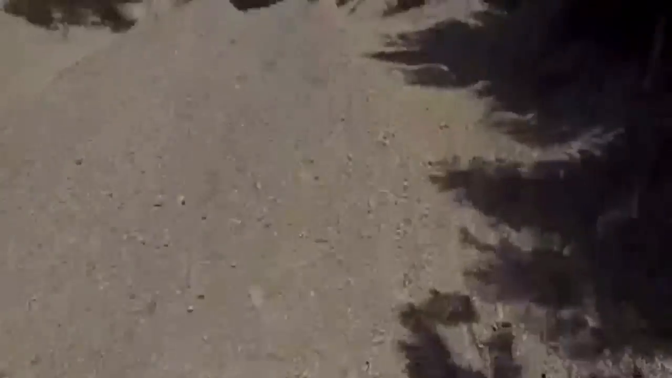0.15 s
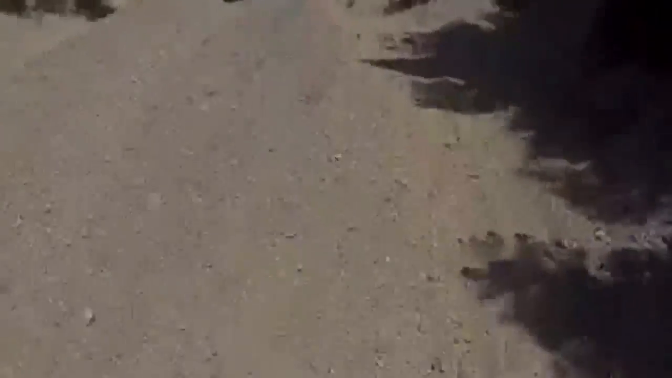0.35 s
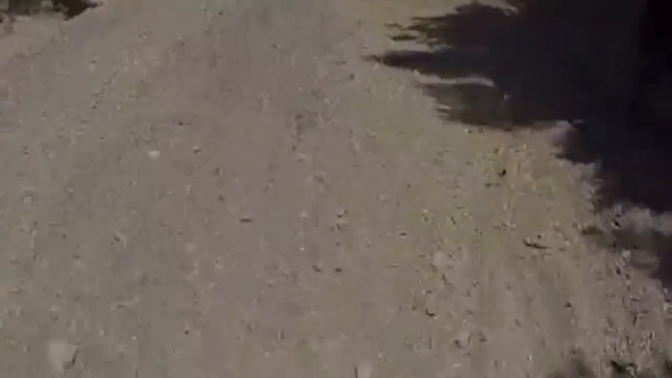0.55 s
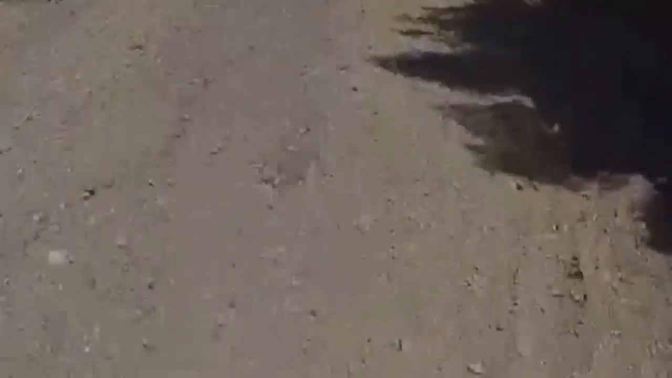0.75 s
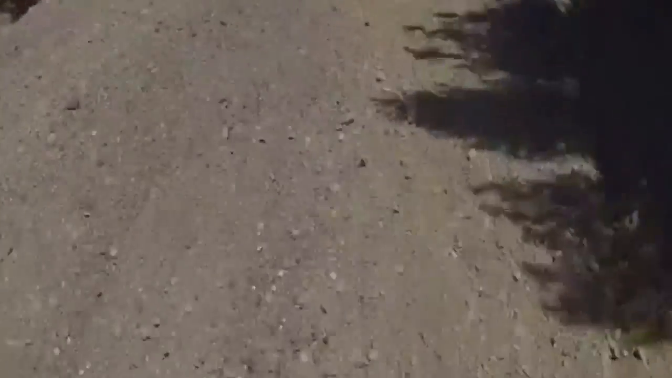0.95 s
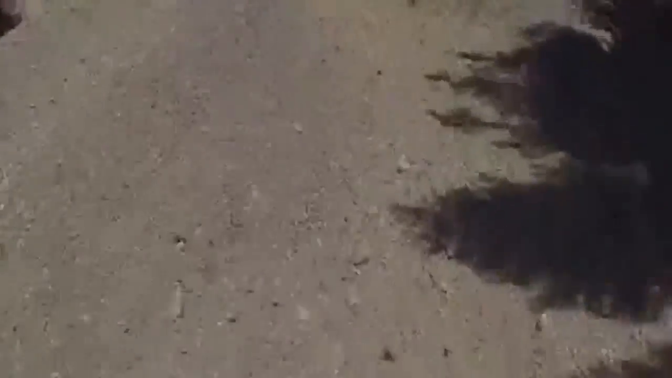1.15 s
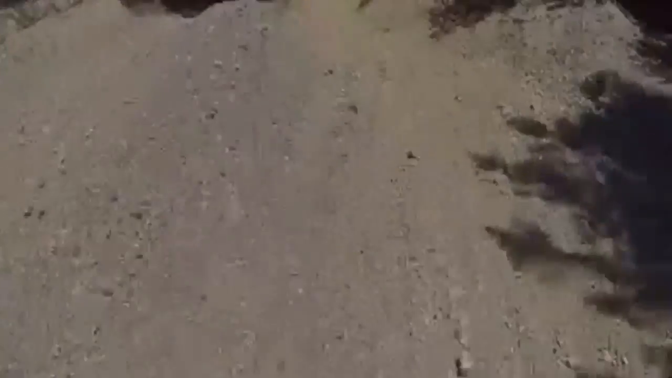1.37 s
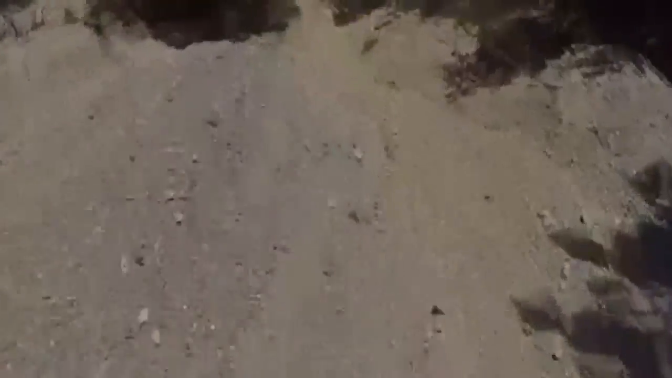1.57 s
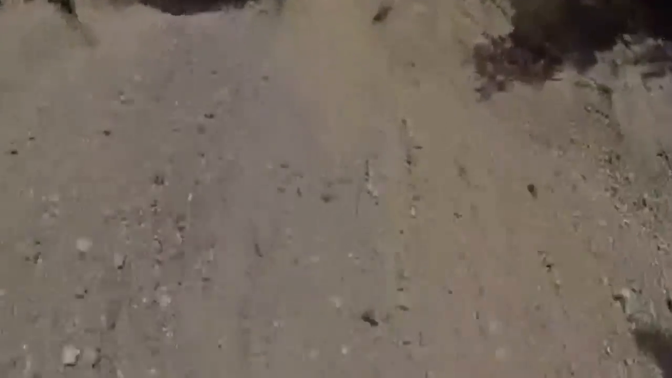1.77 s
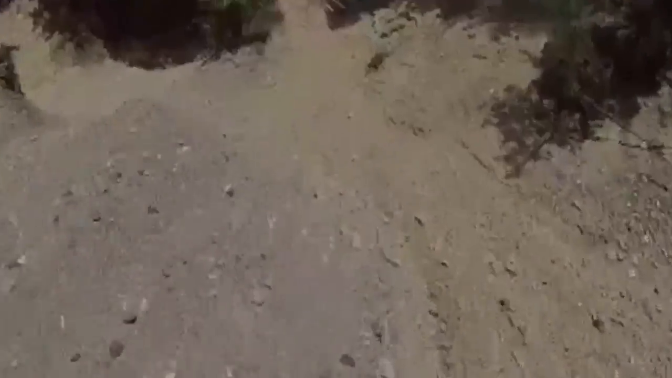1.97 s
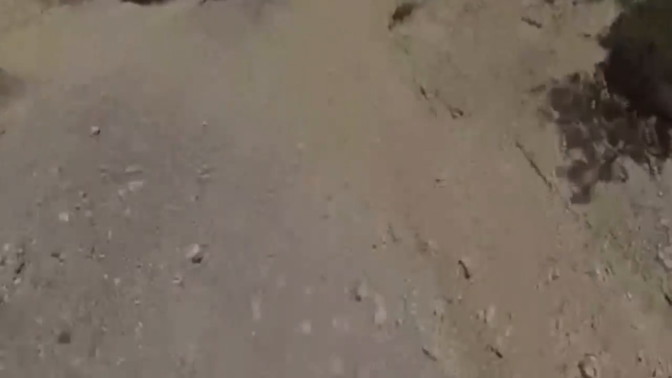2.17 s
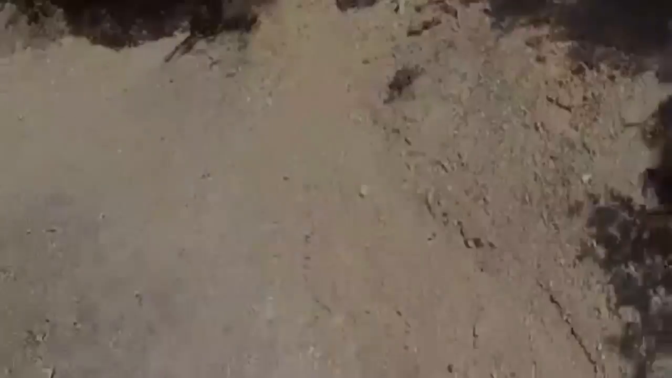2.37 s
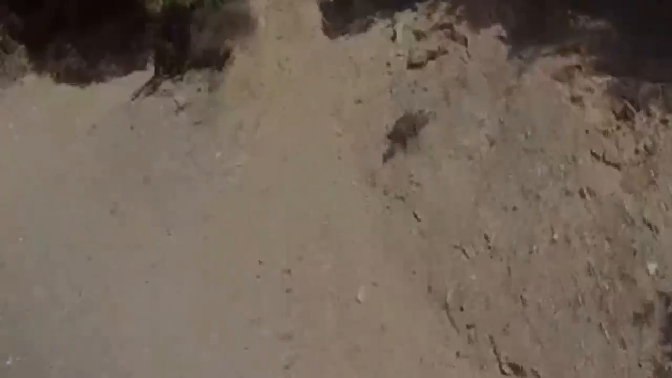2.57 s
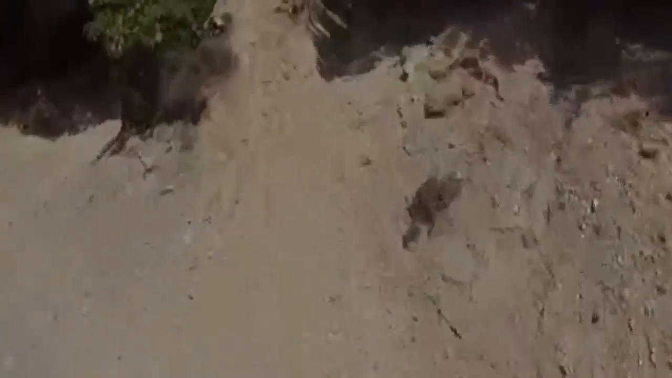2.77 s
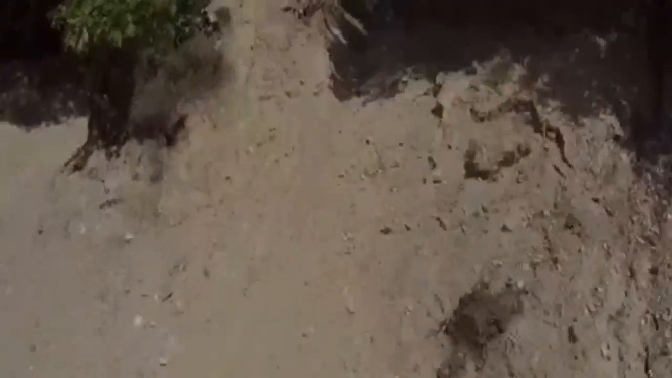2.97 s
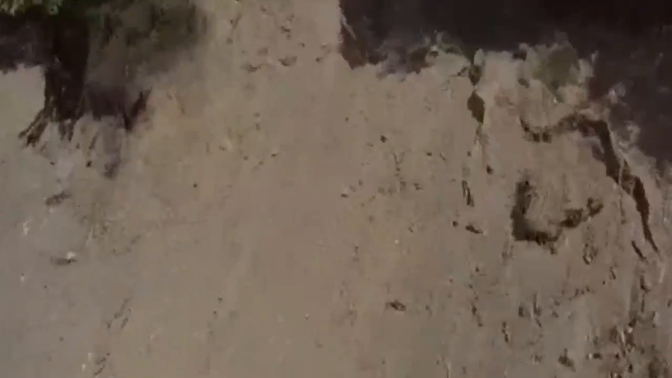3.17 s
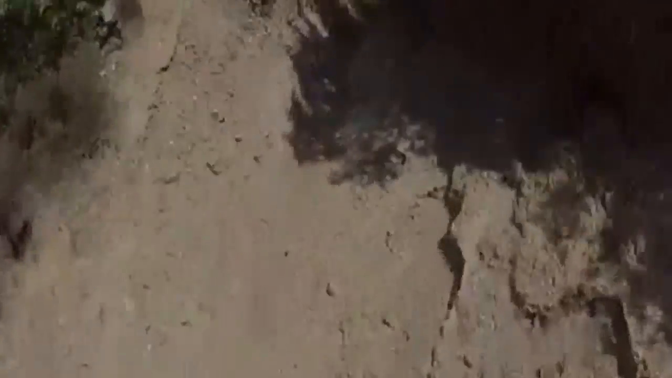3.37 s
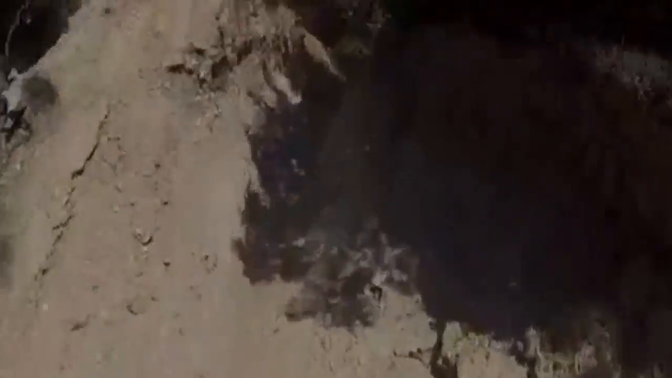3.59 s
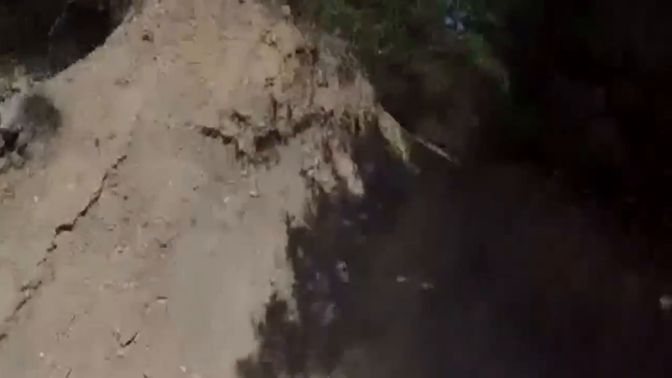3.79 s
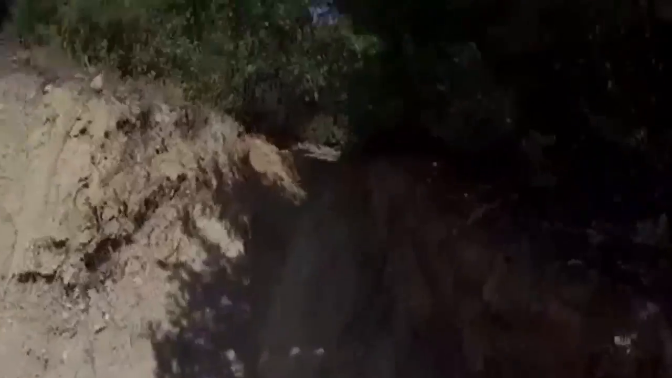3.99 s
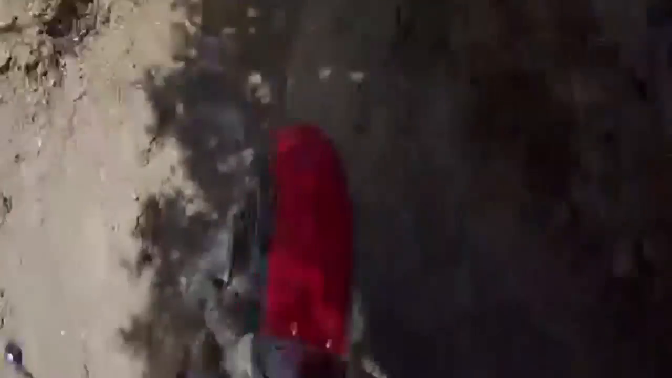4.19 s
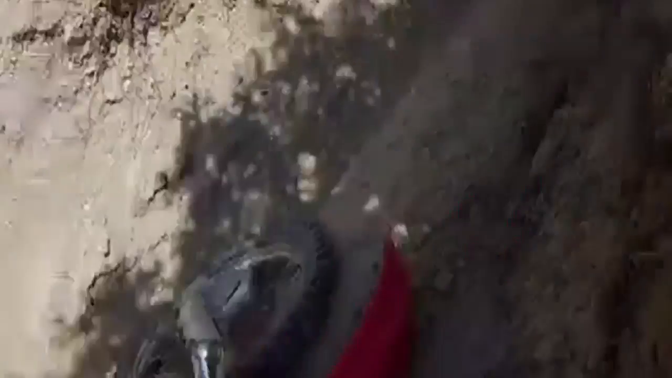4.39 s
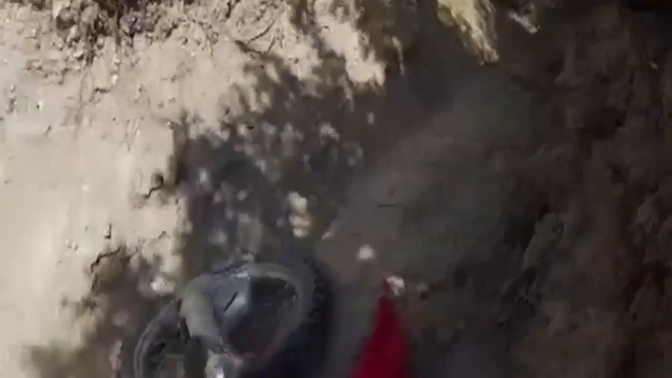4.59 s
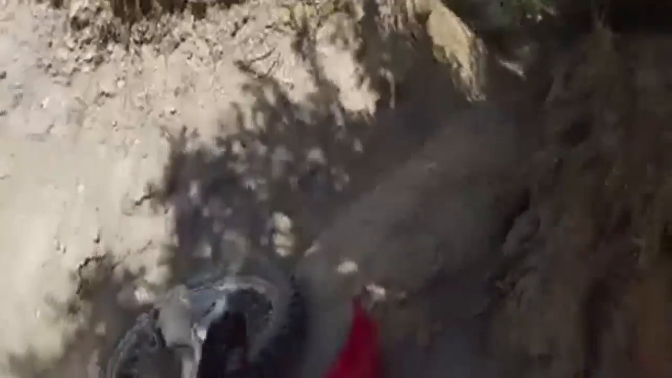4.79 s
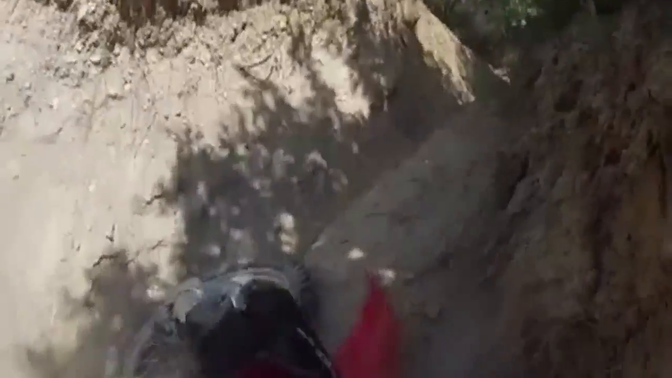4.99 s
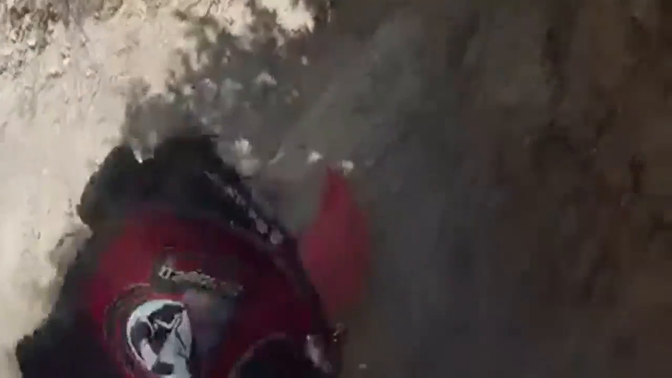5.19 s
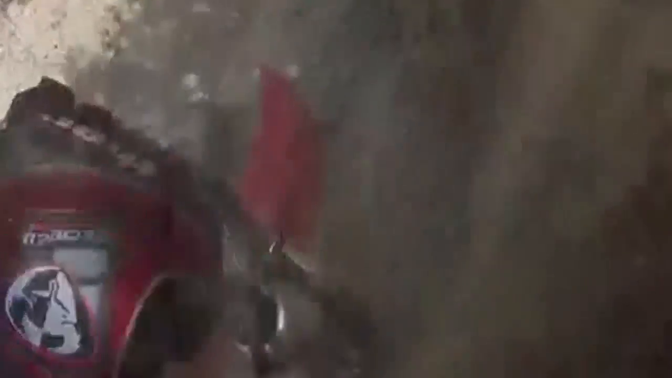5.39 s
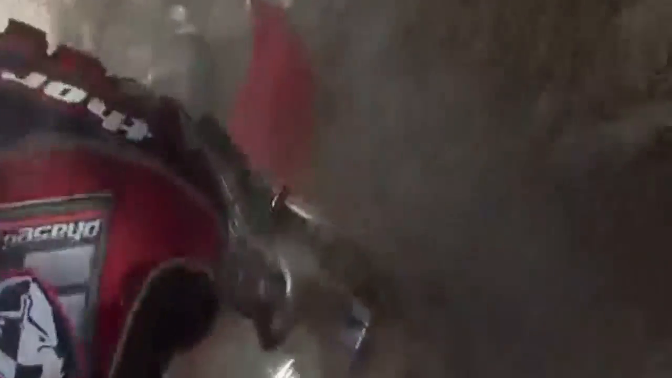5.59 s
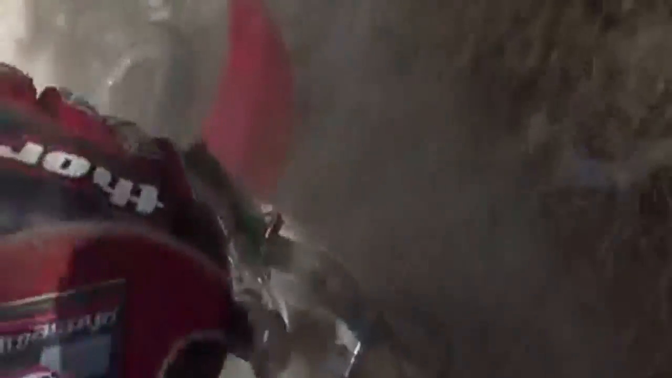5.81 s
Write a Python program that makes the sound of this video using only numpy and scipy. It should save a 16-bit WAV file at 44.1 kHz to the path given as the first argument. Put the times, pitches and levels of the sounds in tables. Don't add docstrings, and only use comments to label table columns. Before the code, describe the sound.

A two-stroke dirt bike rasps and surges up a gravel slope, bogs down and stalls, then crashes with heavy thumps, scraping dirt and ticking pebbles.

```python
import sys
import numpy as np
from scipy import signal
from scipy.fft import rfft, irfft
from scipy.io import wavfile
from scipy.ndimage import uniform_filter1d, map_coordinates

SR = 44100
rng = np.random.default_rng(int(sys.argv[2]) if len(sys.argv) > 2 else 0)


def gain_from_db(level_db):
    decades = np.asarray(level_db, float) / 20
    return 10 ** decades


def wrap_up_sound(samples):
    columns = np.atleast_2d(samples).T
    tamed = np.clip(columns, -1, 1)
    steps = np.round(tamed * 32767).astype(np.int16)
    wavfile.write(sys.argv[1], SR, steps)


N = 257984
CRUISE_DB, CRUISE_HZ = -18, 140

# centre_hz, width_hz, lift_db over the slope
HOUSING = [(1270, 110, 8), (1515, 90, 16), (1650, 130, 11), (1770, 70, 5), (2350, 250, 7), (2590, 90, 9),
           (3400, 130, 5.5), (4080, 80, 7), (5030, 120, 4), (6040, 200, 5), (7200, 250, 5),
           (13000, 700, 12)]
# start_s, end_s, multiple, level_db
SING = [(0, .13, 8, -41), (.07, .12, 10, -26), (.09, .29, 11, -16.5), (.12, .31, 12, -36),
        (.1, .33, 9, -37), (.275, .445, 11, -19), (.3, .44, 10, -26), (.34, .42, 9, -24),
        (.52, .59, 10, -27), (.53, .6, 11, -26), (.54, .6, 12, -24), (.54, .6, 14, -27),
        (.66, .78, 12, -28), (.81, .99, 12, -27), (.86, .98, 10, -24), (.91, 1.01, 11, -27),
        (1, 1.1, 11, -22), (1.03, 1.11, 10, -26), (1.09, 1.19, 12, -28), (1.11, 1.19, 11, -18.5),
        (1.17, 1.25, 11, -24), (1.11, 1.33, 9, -26), (1.24, 1.31, 10, -25), (1.285, 1.35, 10, -17),
        (1.43, 1.53, 11, -21), (1.44, 1.53, 9, -27), (1.51, 1.63, 10, -21.5), (1.57, 1.68, 9, -18),
        (1.62, 1.74, 8, -26), (1.685, 1.75, 9, -21), (1.86, 1.94, 13, -25), (2.05, 2.22, 12, -23),
        (2.07, 2.16, 11, -23), (2.14, 2.43, 10, -29), (2.2, 2.43, 13, -28), (2.23, 2.34, 12, -27),
        (2.34, 2.46, 11, -27), (2.28, 2.43, 9, -31), (2.41, 2.49, 9, -26), (2.56, 2.69, 9, -26),
        (2.61, 2.73, 8, -22.5), (2.62, 2.74, 14, -25), (2.82, 2.91, 11, -20), (2.84, 2.91, 10, -25),
        (2.88, 3.03, 8, -43), (2.88, 3.03, 9, -43), (2.91, 3.03, 10, -41), (2.92, 2.97, 13, -26),
        (2.95, 3, 14, -26)]


def unit(x):
    return x / np.sqrt(np.mean(x ** 2) + 1e-20)


def curves(rows):
    s, *cols = np.transpose(rows)
    return [np.interp(np.arange(N) / SR, s, c) for c in cols]


def peaks(rows):
    t = np.arange(N) / SR
    return sum(np.interp(t, [s - rise, s, s + fall], [0, top, 0]) for s, top, rise, fall in rows)


def wobble(rate):
    knots = rng.standard_normal(int(N * rate / SR) + 4)
    return map_coordinates(knots, [np.arange(N) * rate / SR])


def body(x, slope, modes=()):
    size = 2 ** 14
    hz = np.fft.rfftfreq(size, 1 / SR)
    f, db = np.transpose(slope)
    lift = 1 + sum(gain_from_db(top) ** 2 / (1 + (2 * (hz - c) / w) ** 2) for c, w, top in modes)
    slope_db = np.interp(np.log(hz + 1), np.log(f), db, left=db[0], right=-100)
    gain = gain_from_db(slope_db) * np.sqrt(lift)
    cepstrum = irfft(np.log(gain + 1e-6))
    cepstrum[1:size // 2] *= 2
    cepstrum[size // 2 + 1:] = 0
    return signal.fftconvolve(x, irfft(np.exp(rfft(cepstrum))))[:N]


def engine():
    # time_s, firings_per_s
    speed = [(.03, 157.5), (.11, 139), (.6, 123.6), (.81, 124.5), (1.08, 131), (1.125, 144.5), (1.48, 140),
             (1.7, 180.4), (1.875, 113), (2.15, 141.6), (2.23, 132.6), (2.52, 144.1), (2.69, 183.4),
             (2.75, 182.4), (2.85, 135.3), (3.04, 90.5), (3.46, 73.7), (3.53, 63.2)]
    # peak_s, firings_per_s, build_up_s
    slips = [(.2, 2, .06), (.4, 8.8, .12), (.56, 6.3, .09), (.28, -1.7, .06), (.63, -4, .04), (.7, 2, .06),
             (.79, -2, .05), (.895, 11, .09), (1.025, 13, .045), (1.19, 1.5, .05), (1.25, 2, .05),
             (1.36, 19, .11), (1.785, 14, .085), (1.93, -3, .06), (2.4, -3.3, .17), (2.96, 7.5, .11),
             (3.09, 4, .05), (3.24, -3, .1), (3.31, 6.6, .07), (3.72, 1.5, .17), (3.96, 5, .17),
             (.06, 4, .03), (1.4, 3.5, .04), (1.8, -5, .05), (2, -2, .07), (2.79, -4, .06), (3.01, -5, .07),
             (3.75, -2.3, .05), (1.63, -3.5, .09), (2.855, 4, .025)]
    # time_s, throttle_db, pipe_load_db
    throttle = [(.07, -20, -3), (.12, -11, -5.5), (.41, -12.5, -6.5), (.5, -20.5, 3.5), (.81, -19, -2.5),
                (1.16, -10.5, -3), (1.46, -14, -7.5), (1.56, -11, 0.5), (1.75, -17, -4.5),
                (1.89, -20, -3.5), (2.05, -21.5, 4.5), (2.12, -15.5, -2.5), (2.53, -17.5, -5.5),
                (2.68, -11.5, -7.5), (2.97, -16.5, 1.5), (3.02, -28, 3.5), (3.72, -31.5, -4),
                (4.1, -40.5, -12)]
    # peak_s, change_db, half_length_s
    flicks = [(0.045, 2, 0.027), (0.56, 4.5, 0.071), (.68, 1, 0.064), (1.33, 1.5, 0.031),
              (1.399, -7, 0.0762), (1.823, -9, 0.062), (2.25, -1.5, 0.046), (2.565, -2, 0.147),
              (2.802, -10, 0.089), (2.858, 8, 0.046), (3.942, 6.5, 0.299)]
    grip_s = .065

    rate = curves(speed)[0] + peaks([(s, hz, rise, grip_s) for s, hz, rise in slips])
    turns = np.cumsum(rate) / SR
    hot = np.interp(rate, [88, 108], [0, 1])
    throttle_db, load_db = curves(throttle)
    flick_db = peaks([(s, db, half, half) for s, db, half in flicks])
    open_db = throttle_db - CRUISE_DB
    locked = spells()

    pipe_db = -22 + 0.568 * open_db + flick_db + load_db
    bark_db = throttle_db + flick_db - 4.5 * hot * locked
    rasp_db = -23 + 0.542 * open_db + 0.962 * flick_db + 0.1157 * (rate - CRUISE_HZ)
    shake_db = -32.5 + 0.34 * (open_db + flick_db)

    rough = .26 - .04 * np.minimum(flick_db, 0) + .6 * (1 - hot) - .06 * locked
    rough = rough + .004 * np.maximum(rate - CRUISE_HZ, 0)
    rough = rough.clip(0, .9)
    density = np.sqrt(SR / rate)
    puff = 1.82 + np.exp(-(turns % 1) / 1.04)
    gas = [unit(puff * rng.standard_normal(N)) for _ in range(3)]

    stumble_db = 0.51 + 1.8 * (1 - hot)
    bark_flicker = gain_from_db(stumble_db * wobble(29.2))
    rasp_flicker = gain_from_db(stumble_db * wobble(37.1))
    tones = gain_from_db(pipe_db) * pipe_ring(turns, hot, density, rough, gas[0])
    tones = tones + gain_from_db(bark_db) * bark_flicker * exhaust_bark(turns, density, rough, gas[1])
    rasp = gain_from_db(rasp_db) * rasp_flicker * gas_rasp(turns, rate, hot, density, gas[2])
    shake = (0.281 + hot) * np.sqrt(2) * gain_from_db(shake_db + 1.91 * wobble(25.664)) * np.sin(2 * np.pi * turns)
    running = np.interp(np.arange(N) / SR, [4.08, 4.16, 4.36], [1, .4, 0])
    return running * (shake + singing(tones, turns) + rasp)


def pipe_ring(turns, hot, density, rough, gas):
    # centre_hz, width_hz, lift_db over the slope
    hot_modes = [(257.5, 95.6, 24), (525.3, 161, 14.5), (775, 60.5, 16.5)]
    cool_modes = [(267, 74, 17.17), (531, 66, 16.8), (807.7, 27, 14.75)]
    # freq_hz, gain_db
    hot_slope = [(100, -53), (190, -10), (385, -8), (520, -5), (650, -7), (820, 1.5), (1050, -6.5),
                 (1500, -34)]
    cool_slope = [(100, -32), (185, 0.5), (400, -9), (620, -5), (800, -7.5), (1050, -4.5), (1500, -60.5)]
    # time_s, share
    half_turn_echo = [
        (0, .36),
        (1.3, .36),
        (1.5, .18),
        (5, .18),
    ]

    blasts = pulses(turns, jitter=.004, scatter_db=1.4)
    returning = pulses(turns + .5, jitter=.004, scatter_db=1.4)
    blasts = blasts + curves(half_turn_echo)[0] * hot * returning
    firing = density * blasts + (1.1 * rough * hot + .22 * (1 - hot)) * gas
    hot_ring = unit(body(firing, hot_slope, hot_modes))
    cool_ring = unit(body(smear(firing, spread=0.00795), cool_slope, cool_modes))
    ring = hot * hot_ring + (1 - hot) * cool_ring
    last_firing = np.interp(np.arange(N) / SR, [3.95, 4.0], [1, .45])
    return last_firing * patchy(ring, depth_db=1.6)


def exhaust_bark(turns, density, rough, gas):
    # freq_hz, gain_db
    bark_slope = [(700, -16), (1080, -9), (1200, -3.5), (1800, -4.5), (2000, -15.5), (2600, -8.5),
                  (5000, -12.5), (9000, -25)]
    clean = np.sqrt(1 - rough ** 2) * density * pulses(turns, jitter=.006, scatter_db=1.8)
    return patchy(body(smear(clean + rough * gas, spread=.012), bark_slope, HOUSING), depth_db=2.6)


def gas_rasp(turns, rate, hot, density, gas):
    # freq_hz, gain_db
    hot_slope = [(900, -45.5), (1800, -4), (2300, 0.5), (7300, -3), (8600, -6), (11400, -11.5),
                 (12300, -22), (14600, -29)]
    lug_slope = [(900, -24), (1800, -5), (2300, -4.5), (3500, -1), (5300, -10), (10000, -17),
                 (12300, -25.5), (14600, -30)]
    # centre_hz, width_hz, lift_db
    fin_modes = [(2590, 50, 30), (3450, 70, 25), (4080, 70, 27)]
    edge = gas + .7 * hot * smear(density * pulses(turns, jitter=.002, scatter_db=1.5), spread=.008)
    fins = unit(body(edge, [(2000, -35.0), (6000, -33.5)], fin_modes))
    fins = gain_from_db(np.interp(rate, [146, 165], [-24, -2])) * fins
    hot_rasp = patchy(body(edge, hot_slope, HOUSING), depth_db=4.0) + fins
    return hot * hot_rasp + (1 - hot) * unit(body(edge, lug_slope, HOUSING))


def pulses(turns, jitter, scatter_db):
    whole = np.arange(1, int(turns[-1]))
    chance = rng.standard_normal((1000, 2))[:len(whole)]
    at = np.interp(whole + jitter * chance[:, 0], turns, np.arange(N))
    index = at.astype(int)[:, None] + np.arange(-7, 9)
    lag = index - at[:, None]
    shape = np.sinc(lag) * np.cos(np.pi * lag / 18) ** 2
    height = gain_from_db(scatter_db * chance[:, 1:])
    return np.bincount(index.clip(0, N - 1).ravel(), (height * shape).ravel(), N)


def smear(x, spread):
    hz = np.fft.rfftfreq(len(x), 1 / SR)
    knots_hz = np.arange(0, SR / 2, 120)
    delay = spread * np.interp(hz, knots_hz, rng.random(len(knots_hz)))
    return irfft(rfft(x) * np.exp(-2j * np.pi * np.cumsum(delay) * hz[1]), len(x))


def patchy(x, depth_db):
    z = signal.stft(x, nperseg=2048)[2]
    field = uniform_filter1d(rng.standard_normal(z.shape), size=5, axis=0)
    field = uniform_filter1d(field, size=7, axis=1)
    return unit(signal.istft(z * gain_from_db(depth_db * unit(field)), nperseg=2048)[1][:N])


def singing(x, turns):
    # start_s, end_s, multiple, level_db
    hum = [(.07, .33, 2, -30), (.09, .51, 3, -45), (.08, .47, 5, -42), (.12, .44, 6, -32.5),
           (.42, .62, 6, -28.5), (.43, 1.22, 2, -24.5), (.46, 1.31, 4, -32.5), (.58, .85, 3, -50),
           (.67, .83, 6, -32), (.81, 1.11, 6, -28), (1.12, 1.26, 7, -36), (1.2, 1.34, 2, -30),
           (1.47, 1.76, 5, -44), (1.51, 1.62, 2, -24), (1.51, 1.71, 3, -30), (1.63, 1.85, 2, -42),
           (1.84, 2.1, 2, -25), (1.86, 1.98, 7, -32), (1.86, 1.93, 5, -33), (1.89, 1.98, 3, -32),
           (1.99, 2.18, 6, -30), (2.08, 2.21, 2, -29), (2.13, 2.36, 3, -40), (2.67, 2.76, 7, -29),
           (2.86, 2.99, 2, -23.5), (2.86, 2.94, 6, -30), (2.86, 2.97, 4, -29.5), (2.94, 3, 7, -26),
           (3.02, 3.45, 3, -38), (3.02, 3.17, 6, -38), (3.03, 3.41, 4, -53), (2.17, 2.5, 6, -37.5),
           (3.19, 3.5, 7, -43), (3.25, 3.37, 6, -42), (3.4, 3.52, 8, -43), (3.41, 3.51, 4, -34),
           (3.51, 3.83, 5, -37), (3.52, 3.77, 9, -43.5), (3.54, 3.69, 4, -58), (3.75, 3.95, 4, -38),
           (3.79, 3.94, 6, -43)]
    lock_db = 4.5
    out = x.copy()
    waver = gain_from_db(1.5 * wobble(30)) / np.sqrt(2) * np.exp(.2j * wobble(40))
    for start, end, order, db in SING + hum:
        on, spell = opening(start, end)
        spin = np.exp(2j * np.pi * order * turns[on])
        own = x[on] / spin
        own = uniform_filter1d(own.real, size=600) + 1j * uniform_filter1d(own.imag, size=600)
        tone = gain_from_db(db + lock_db) * np.roll(waver, 5000 * order)[on]
        out[on] += 2 * spell * ((tone - own) * spin).real
    return out


def spells():
    locked = np.zeros(N)
    for start, end, _, db in SING:
        on, spell = opening(start, end)
        locked[on] = np.maximum(locked[on], spell * np.clip((db + 29) / 9, 0, 1))
    return locked


def opening(start, end):
    on = slice(round(start * SR), round(end * SR))
    t = np.arange(N)[on] / SR
    return on, np.clip(np.minimum(t - start, end - t) / .025, 0, 1)


def thumps():
    # start_s, strength_db, swing_hz, shell_knock_db
    jolts = [(3.046, -30.5, 98, -7.5), (3.167, -23, 116.7, -25), (3.355, -29, 95, -24.5),
             (3.488, -25, 105.6, -11), (3.679, -20.5, 120.7, -9), (3.697, -22.5, 99.6, -14),
             (3.93, -24.5, 108.5, -21.5), (4.052, -22.5, 126.8, -11.5), (4.064, -15.5, 106.7, -33.5),
             (4.113, -13.5, 43.6, -28), (4.229, -24.5, 121.5, -18), (5.147, -32, 98.5, 0),
             (5.188, -46.5, 101, 5.5), (5.256, -29, 107.8, -24), (5.421, -27.5, 144.2, -16.5),
             (5.433, -28.5, 103.2, -25), (5.633, -38, 106.5, -28.5)]
    # start_s, strength_db, swing_hz (- inwards first), t60_s, shell_knock_db
    tumble = [(4.465, -1.5, 99.5, 0.125, -35.5), (4.5244, -14, 111, 0.162, -18.5),
              (4.546, -5.5, 75, 0.052, -40), (4.5528, 1.5, -190, 0.0283, -22.5),
              (4.5596, -10.5, 173, 0.034, -19.5), (4.5761, -0.5, 103.5, 0.127, -19.5),
              (4.639, -17, 98, 0.33, -35.5), (4.873, -4.5, 94.5, 0.165, -16),
              (4.915, -13.5, 94.5, 0.089, -10.5), (4.966, -22.5, 118, 0.057, -3),
              (4.983, -9, 113.5, 0.178, -22), (5.045, -27.5, 90, 0.836, -28)]
    # start_s, strength_db, swing_hz, t60_s, rise_s
    impact = [
        (4.4189, 7, 63.2, 0.053, 0.0094),
        (4.4256, 5, 109, 0.0288, 0.00182),
    ]
    # freq_hz, level_db, t60_s
    shell_modes = [(302, 7.5, 0.096), (198.9, -3, 0.087), (422, -2.5, 0.054), (690, -5.5, 0.047),
                   (820, -44, 0.029)]
    jolt_t60_s, rise_cycles, impact_knock_db = 0.128, 0.4, -36.5

    out, t = np.zeros(N + SR), np.arange(SR // 2) / SR
    rows = [(s, db, hz, jolt_t60_s, rise_cycles / hz, knock, -1) for s, db, hz, knock in jolts]
    rows += [(s, db, hz, t60, rise_cycles / abs(hz), knock, 1) for s, db, hz, t60, knock in tumble]
    rows += [(*row, impact_knock_db, way) for row, way in zip(impact, (-1, 1))]
    chances = rng.standard_normal((len(rows), len(shell_modes)))
    for (s, db, hz, t60, rise, knock_db, direction), chance in zip(rows, chances):
        swing = gain_from_db(-60 * t / t60) * (1 - np.exp(-t / rise)) * np.sin(2 * np.pi * hz * t)
        shell = np.zeros(len(t))
        for (f, level, ring), c in zip(shell_modes, chance):
            shell += gain_from_db(level + 2.2 * c - 60 * t / ring) * np.sin(2 * np.pi * f * (1 + .03 * c) * t)
        knock = gain_from_db(knock_db) * (1 - np.exp(-t / 0.00379)) * shell
        out[round(s * SR):][:len(t)] += np.sign(direction) * gain_from_db(db) * (swing + knock)
    return out[:N]


def dirt():
    # start_s, peak_db, bright_part_db, t60_s
    ticks = [(4.142, -25.5, -23, 0.16), (4.2198, -27, -13, 0.13), (4.2607, -41, -21.5, 0.032),
             (4.2896, -26, -14, 0.105), (4.3809, -21.5, 8.5, 0.1655), (4.4205, -12.5, -13, 0.048),
             (4.465, -23, -30.5, 0.047), (4.4956, -32.5, -18.5, 0.086), (4.517, -22, -21, 0.078),
             (4.5576, -28.5, -13, 0.04), (4.5735, -26, -15, 0.078), (4.594, -29.5, -16.5, 0.096),
             (4.6878, -33, -28.5, 0.039), (4.7511, -24, -23, 0.047), (4.7712, -23, -13.5, 0.25),
             (4.8074, -20, -19, 0.09), (4.8245, -15.5, -21, 0.087), (4.846, -19, -17, 0.087),
             (4.86, -16, -13.5, 0.075), (4.8734, -9.5, -27.5, 0.052), (4.964, -28, -10, 0.125),
             (4.998, -18.5, -32, 0.049)]
    # start_s, peak_db, bright_part_db
    pebbles = [(5.1444, -41, -22.5), (5.1893, -26.5, -8), (5.247, -43, -22), (5.258, -42.5, -22.5),
               (5.27, -44, -22), (5.299, -38, -7), (5.378, -32.5, -4.5), (5.4215, -36, -20.5),
               (5.431, -43, -2), (5.492, -44.5, 10), (5.5042, -48, 6.5), (5.529, -48, 3),
               (5.602, -54.5, 8.5), (5.6675, -57, 8.5), (5.796, -54.5, 5.5)]
    # freq_hz, gain_db
    scrape_slope = [(300, -31.5), (800, -18), (1200, -5), (1900, 1), (2400, 4.5), (3000, 0), (4500, -3),
                    (7000, -37.5)]
    grit_slope = [(1500, -26), (3500, -3), (5500, 1), (8000, -4.5), (13000, -13.5), (15000, -48.5)]
    pebble_t60_s = 0.0448

    scrape, grit = slides()
    fallen = np.interp(np.arange(N) / SR, [4.0, 4.12], [0, 1])
    grains = []
    for _ in range(2):
        clumps = gain_from_db(1.94 * wobble(70) + 1.78 * wobble(500))
        grains.append(unit(rng.standard_normal(N) * clumps))
    dull, bright = scrape * fallen * grains[0], grit * fallen * grains[1]

    hits = ticks + [(*row, pebble_t60_s) for row in pebbles]
    t = np.arange(SR // 8) / SR
    for (s, db, bright_db, t60), burst in zip(hits, rng.standard_normal((len(hits), 2, len(t)))):
        span = slice(round(s * SR), round(s * SR) + len(t))
        crack = 2.5 * np.exp(-(t60 / .045) ** 2) * gain_from_db(-60 * t / .007)
        tail = (gain_from_db(db - 8.5) * (gain_from_db(-60 * t / t60) + crack) * burst)[:, :len(dull[span])]
        dull[span] += tail[0]
        bright[span] += gain_from_db(bright_db) * tail[1]

    plain = rng.standard_normal(N)
    out = np.zeros(N)
    for x, slope in [(dull, scrape_slope), (bright, grit_slope)]:
        out += body(x, slope, HOUSING) / np.std(body(plain, slope, HOUSING))
    return out


def slides():
    # peak_s, scrape_db, rise_s per 20 dB, fall_s per 20 dB, grit_db over scrape
    soil = [
        (4.0, -36, .1, 0.33, -22.5),
        (4.33, -41.5, 0.85, 0.25, -8.5),
        (4.39, -46, 0.6, 0.02, -2.5),
        (4.525, -34.5, 0.11, 0.0718, -10),
        (4.869, -33, 0.284, 0.1821, -13),
        (5.008, -36, -0.0045, 0, -9.5),
        (5.08, -47.5, 2, 0.14, -12),
        (5.2, -60.5, -2, 0.5, -29),
    ]
    t = np.arange(N) / SR
    scrape_power, grit_power = np.zeros(N), np.zeros(N)
    for s, db, rise, fall, grit_db in soil:
        with np.errstate(all="ignore"):
            level = gain_from_db(db - 20 * np.maximum((s - t) / abs(rise), (t - s) / abs(fall)))
        scrape_power += level ** 2
        grit_power += (level * gain_from_db(grit_db)) ** 2
    return np.sqrt(scrape_power), np.sqrt(grit_power)


def stones():
    # start_s, level_db, pitch_hz, t60_s
    rings = [(3.742, -30, 1519, 0.084), (3.789, -22, 1504, 0.097), (3.915, -24, 1566, .06),
             (4.479, -25.5, 637, 0.037), (4.556, -21, 690, 0.0346), (4.5185, -28, 1970, .02),
             (4.524, -25, 1348, 0.0243), (4.574, -26.5, 2620, 0.03), (4.592, -29, 1607, .03),
             (4.7512, -22.5, 2273, 0.044), (4.824, -19.5, 2284, 0.036), (4.835, -20.5, 2500, 0.042),
             (4.851, -17.5, 2405, 0.031), (4.86, -16.5, 2427, 0.048), (4.8732, -19.5, 2454, 0.038),
             (4.99, -22.5, 2530, 0.0164), (4.9985, -22, 1315, 0.0325), (5, -28.5, 4310, 0.022),
             (5.072, -43, 4000, .02), (5.073, -46, 6900, 0.019), (5.083, -45, 3890, 0.0194),
             (5.189, -24.5, 2795, 0.0244), (5.1905, -29.5, 4110, 0.0147), (5.3, -40.5, 1500, 0.042),
             (5.38, -34.5, 1430, 0.04), (5.4215, -43, 2380, 0.0163), (5.433, -51, 2950, .08),
             (5.439, -41, 1620, .03)]
    out, t = np.zeros(N + SR), np.arange(SR // 8) / SR
    for (s, db, hz, t60), rattle in zip(rings, rng.standard_normal((len(rings), len(t)))):
        drift = np.cumsum(rattle) * .03
        ring = gain_from_db(db - 60 * t / t60) * (1 - np.exp(-t / 0.0003)) * np.sin(2 * np.pi * hz * t + drift)
        out[round(s * SR):][:len(t)] += ring
    return out[:N]


def wind():
    # time_s, buffet_db, mount_jiggle_db
    gusts = [(0.0, -27, -47), (0.16, -25, -37.5), (0.29, -34.5, -43), (0.96, -32.5, -41),
             (2.54, -38, -44.5), (3.03, -26.5, -39.5), (3.54, -33.5, -47), (3.66, -35.5, -45.5),
             (3.72, -26, -46), (4.09, -24.5, -48.5), (4.33, -31, -45), (4.4, -26, -53), (4.56, -36, -22.5),
             (4.69, -43.5, -44.5), (4.89, -30, -29.5), (5.05, -47.5, -36.5), (5.26, -48.5, -59.5),
             (5.85, -49, -68)]
    # freq_hz, gain_db
    buffet_slope = [(8, -1), (22, -1), (45, -10.5), (70, -28), (200, -27), (600, -36.5), (1500, -32)]
    mount_slope = [(40, -25.5), (80, -1.5), (200, -4), (400, -9.5), (900, -45.5)]
    # centre_hz, width_hz, lift_db over the slope
    mount_modes = [(95, 8.47, 21.5), (146.5, 10.7, 17.5), (310, 68, -5)]
    buffet_db, jiggle_db = curves(gusts)
    buffet = unit(gain_from_db(1.97 * wobble(14.0)) * body(rng.standard_normal(N), buffet_slope))
    jiggle = unit(body(gain_from_db(1.55 * wobble(20)) * rng.standard_normal(N), mount_slope, mount_modes))
    return gain_from_db(buffet_db) * buffet + gain_from_db(jiggle_db + 5.0) * jiggle


def hiss():
    # freq_hz, density_db per Hz
    hiss_slope = [(88, -20), (150, -14), (693, -18), (1520, -13.5), (3870, -13.5), (5900, -16.5),
                  (12700, -22.5), (14500, -43)]
    return gain_from_db(-61.5) * unit(body(rng.standard_normal(N), hiss_slope))


def scene():
    # time_s, gain_db
    stun = [
        (4.43, -5.5),
        (4.438, -8),
        (4.461, -21.5),
        (4.464, 0.5),
    ]
    mono = gain_from_db(curves(stun)[0]) * (engine() + dirt() + stones() + wind() + hiss()) + thumps()
    return np.array([mono, mono])


def starve(x, edge_hz, below_db):
    hz, s, z = signal.stft(x, SR, nperseg=1024)
    power = np.abs(z) ** 2
    loudness = uniform_filter1d(power.sum(1, keepdims=True), size=23, axis=2)
    patch = np.abs(uniform_filter1d(power, size=3, axis=1))
    margin = gain_from_db(2 * np.interp(hz, [edge_hz, edge_hz + 4000], [below_db - 15, below_db]))[:, None]
    tiles = np.kron(rng.standard_normal((len(hz) // 8 + 1, len(s) // 3 + 1)), np.ones((8, 3)))
    margin = margin * gain_from_db(6 * tiles[:len(hz), :len(s)])
    keep = 1 / (1 + (margin * loudness / (patch + 1e-20)) ** 8)
    gaps = (abs(hz - 8600) < 150) | (abs(hz - 9400) < 120) | (hz > 10600)
    keep = np.where((s > 4.455) & (s < 5.09), ~gaps[:, None] * keep ** .1, keep)
    return signal.istft(z * np.where(hz[:, None] > edge_hz, keep, 1), SR, nperseg=1024)[1][:, :N]


def band_limit(x):
    return signal.sosfilt(signal.butter(12, 14760, fs=SR, output="sos"), x)


def record(dry):
    top = .97
    limited = dry / (1 + np.abs(dry / top) ** 6) ** (1 / 6)
    thinned = starve(limited, edge_hz=7500, below_db=-49)
    return band_limit(thinned)


dry = scene()
out = record(dry)
wrap_up_sound(out)
```